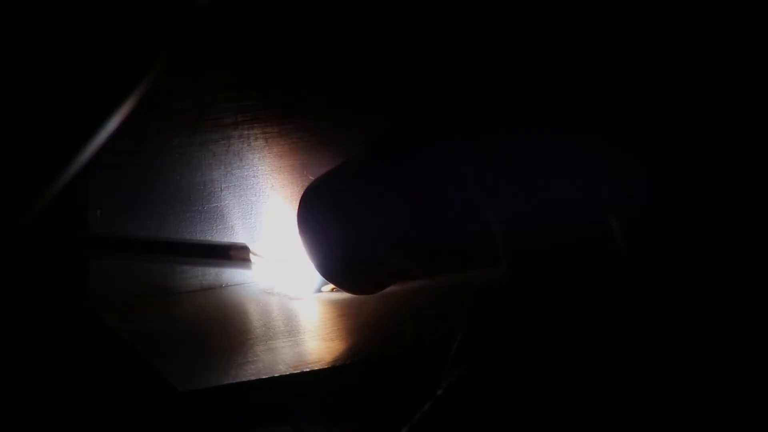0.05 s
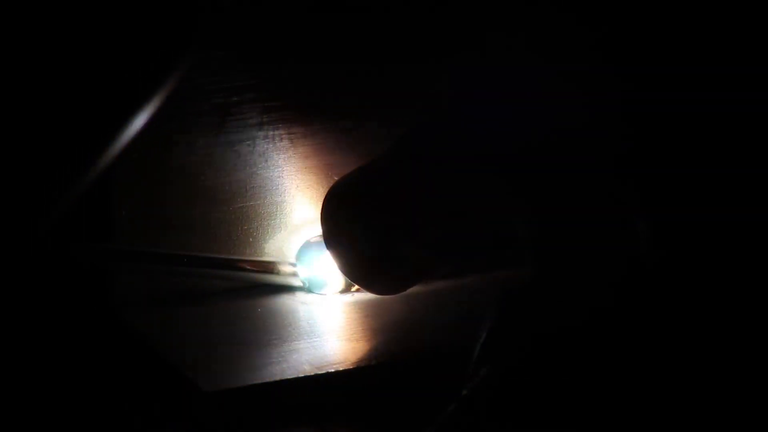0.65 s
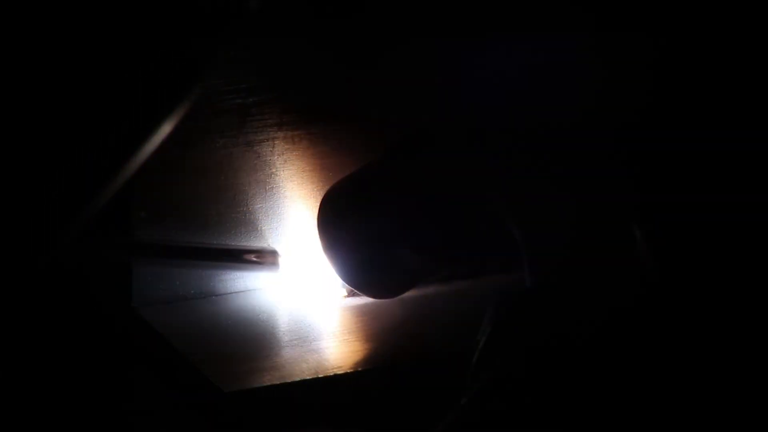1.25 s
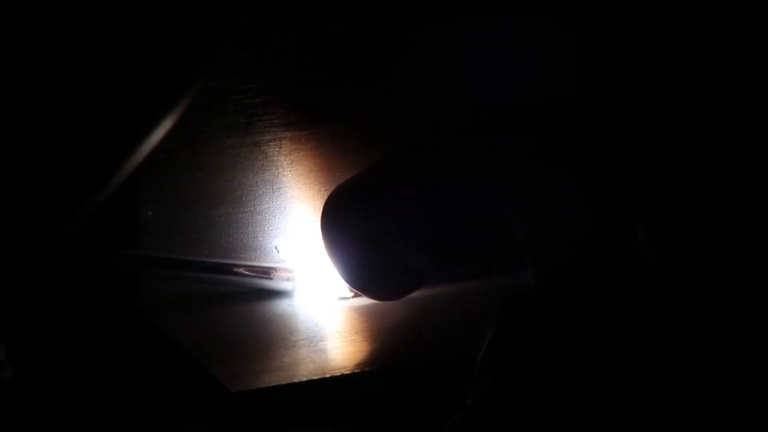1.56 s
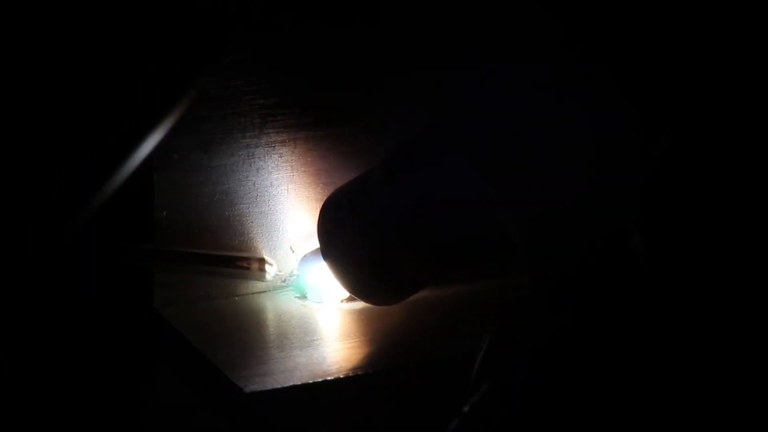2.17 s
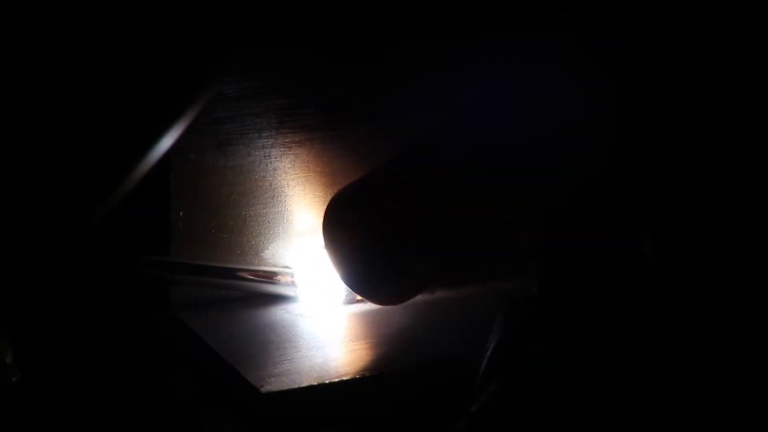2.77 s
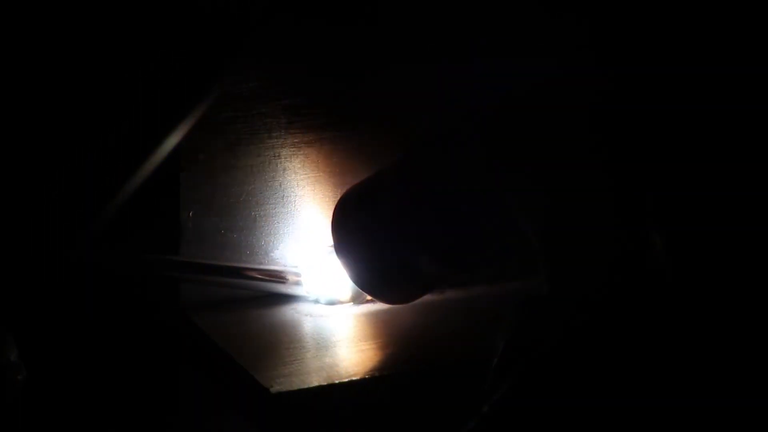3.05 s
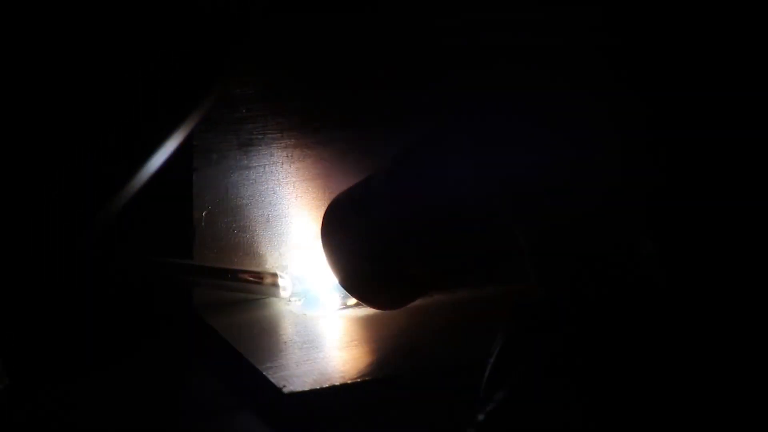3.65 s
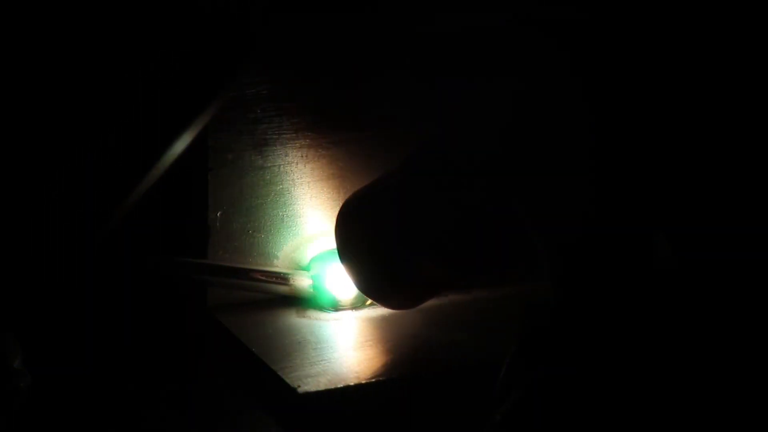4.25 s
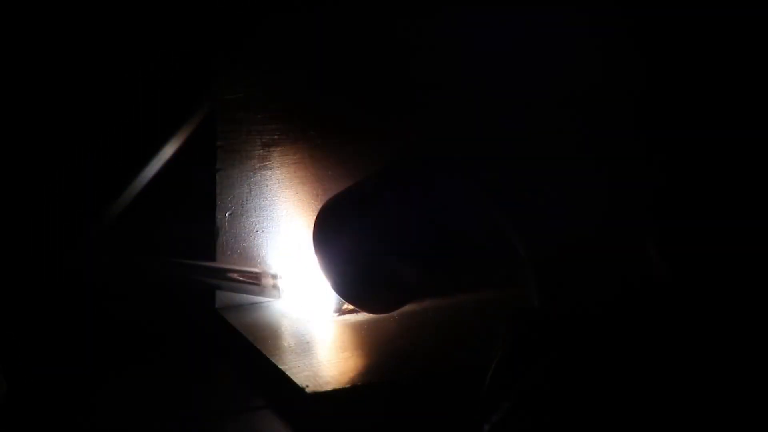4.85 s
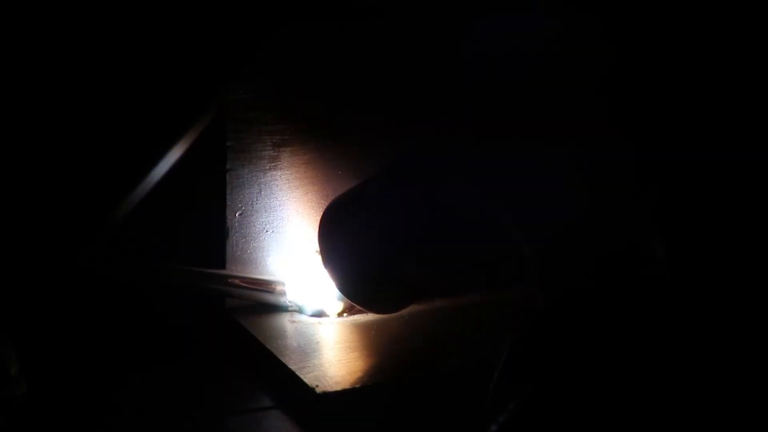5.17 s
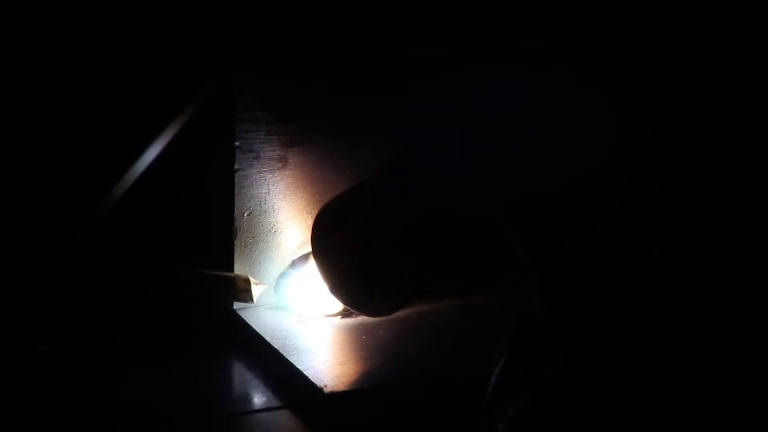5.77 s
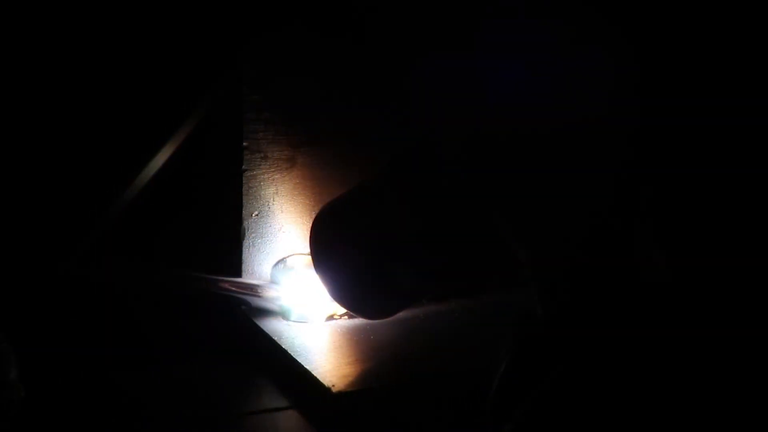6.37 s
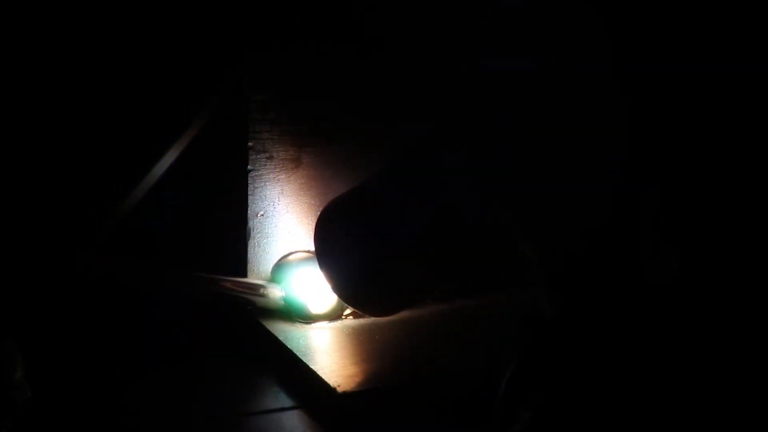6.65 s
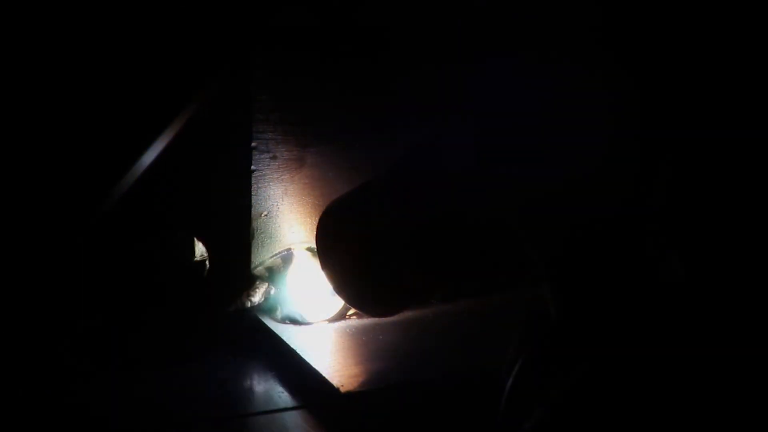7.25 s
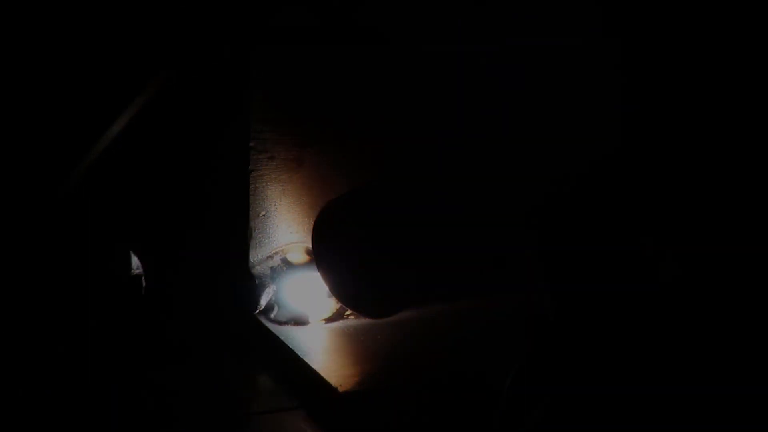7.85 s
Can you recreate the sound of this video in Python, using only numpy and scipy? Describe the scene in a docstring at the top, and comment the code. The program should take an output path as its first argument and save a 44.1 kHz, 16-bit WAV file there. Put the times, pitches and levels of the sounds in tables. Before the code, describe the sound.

A welding arc buzzes without a break as a torch runs along a seam between metal plates. The buzz is bright and raspy, with a thin high whine in it. About once a second it turns rough and crackly as the filler rod dips in, spitting twice around the middle, and it weakens at the end. Faint gas hiss and a fan lie behind. The arc is close and slightly to the right.

```python
"""A workshop, where an AC TIG arc runs along a seam between two steel plates.
Twice a cycle the current reverses: the arc re-ignites with a sharp snap, then a soft tick, and the
inverter whines round each reversal. Filler dipped in the pool makes the snaps fat and uneven and
sometimes spits; snaps and pops set the plates ringing. Behind the arc, shielding gas hisses, the
supply hums, the welder's fan runs and other machinery sings faintly."""
import sys
import numpy as np
from scipy import signal
from scipy.fft import rfft, irfft, next_fast_len
from scipy.io import wavfile
from scipy.ndimage import uniform_filter1d

SR = 44100
rng = np.random.default_rng(int(sys.argv[2]) if len(sys.argv) > 2 else 0)


def file_out(sig):
    """Save sig as 16-bit WAV at sys.argv[1]."""
    # one column per channel
    cols = np.atleast_2d(sig).T
    # limit, then scale
    lim = np.clip(cols, -1, 1)
    pcm = np.round(lim * 32767).astype(np.int16)
    wavfile.write(sys.argv[1], SR, pcm)


N = 348390
TIME = np.arange(N) / SR
AC_HZ, FIRST_SNAP_S, SOFT_DELAY_S = 118.929, .00785, .003165   # the soft reversal trails the snap
SIDES = np.array([[1], [-1]])   # adds on the left, subtracts on the right


def from_db(db):
    """Decibels to amplitude."""
    return 10 ** (np.asarray(db) / 20)


def unit_rms(x):
    """The signal scaled to rms 1."""
    return x / np.sqrt(np.mean(x ** 2) + 1e-20)


def at_times(rows, t):
    """Each column of an automation table, read at times t."""
    times, *columns = np.transpose(rows)
    return [np.interp(t, times, column) for column in columns]


def at_hz(curve, hz):
    """A curve read along a log-frequency axis."""
    corners_hz, values = np.transpose(curve)
    return np.interp(np.log(np.maximum(hz, 1)), np.log(corners_hz), values)


def drift(spread, step_s, start_s=0, end_s=TIME[-1] + 1):
    """A random curve that glides to a new value every step."""
    steps = np.arange(start_s, end_s, step_s)
    return np.interp(TIME, steps, rng.normal(0, spread, len(steps)))


def pan(left_over_right_db):
    """Left and right gains with the given level gap."""
    return from_db(SIDES * left_over_right_db / 2)


def resonance(x, hz, width_hz):
    """Two-pole band-pass with gain 1 at its peak."""
    r = np.exp(-np.pi * width_hz / SR)
    poles = [1, -2 * r * np.cos(2 * np.pi * hz / SR), r * r]
    return signal.lfilter(np.array([1, 0, -1]) * (1 - r * r) / 2, poles, x + 1e-18)


def noise(spectrum):
    """Noise of the given colour, rms 1."""
    size = next_fast_len(N)
    colour = from_db(at_hz(spectrum, np.arange(size // 2 + 1) * SR / size))
    return unit_rms(irfft(rfft(rng.standard_normal(size)) * colour, size)[:N])


def noise_band(hz, width_hz):
    """Noise ringing through one resonance, rms 1."""
    return unit_rms(resonance(rng.standard_normal(N), hz, width_hz))


# Colour of the fan's air rush: (frequency [Hz], level [dB])
RUSH_COLOUR = [(25, -25), (50, -7.5), (110, -13), (160, -6.5), (240, -4.5), (480, -2.5), (700, -3),
               (880, -5.5), (1150, -5), (1600, -7), (2400, -10.5), (3400, -20), (6000, -40)]
# Air resonances in the fan housing: (frequency [Hz], width [Hz], level [dB])
HOUSING_MODES = [(150.3, 8, -77.5), (169.8, 18.8, -75), (295, 14, -83), (384, 62, -77.5), (1160, 70, -77),
                 (1294, 25, -79.5)]
# Stereo image of the fan: (frequency [Hz], left-right likeness [0-1])
FAN_LIKENESS = [(30, 1), (150, 0.98), (300, 0.8), (550, 0.74), (1100, 0.23), (2500, 0.029)]
def fan(rush_db=-67.5):
    """Air rushes through a resonant housing: centred in the bass, diffuse above."""
    size = next_fast_len(N)
    spectra = []
    for _ in range(2):
        rush = from_db(rush_db) * noise(RUSH_COLOUR)
        housing = sum(from_db(db) * noise_band(hz, width) for hz, width, db in HOUSING_MODES)
        spectra.append(rfft(rush + housing, size))
    mid, side = spectra
    alike = np.clip(at_hz(FAN_LIKENESS, np.linspace(0, SR / 2, len(mid))), 0, 1)
    spread = np.sqrt((1 - alike) / (1 + alike))
    return irfft(mid + spread * side * SIDES, size)[:, :N]


# Partials of the fan's blade tone: (harmonic [x blade rate], level [dB])
BLADE_PARTIALS = [(1, -78.5), (2, -78.5), (3, -82.5)]
def blades(blade_hz=245.2, wander_rad=0.473):
    """The passing blades drone; the fan's speed wanders slightly."""
    phase = 2 * np.pi * blade_hz * TIME + drift(wander_rad, step_s=0.4064)
    return sum(np.sqrt(2) * from_db(db) * np.sin(order * phase) for order, db in BLADE_PARTIALS)


# Machines elsewhere in the shop: (frequency [Hz], level [dB])
MACHINE_TONES = [(402.6, -82.5), (805.2, -84), (1308, -83.5)]
def machinery(width_hz=2.2):
    """Other running machines lay faint, wavering tones into the bed."""
    return sum(from_db(db) * noise_band(hz, width_hz) for hz, db in MACHINE_TONES)


# Colour of the gas hiss: (frequency [Hz], level [dB])
GAS_COLOUR = [(1500, -10.5), (2600, -4), (3750, 2.5), (4500, -2), (5200, -4), (7200, 4), (10000, 2),
              (13000, 0), (16000, -9)]
def gas(level_db=-62.5, width=0.92):
    """Shielding gas leaves the cup in a wide, bright hiss."""
    return from_db(level_db) * (noise(GAS_COLOUR) + width * noise(GAS_COLOUR) * SIDES)


# Partials of the electrical hum: (harmonic [x AC rate], level [dB])
HUM_PARTIALS = [(2, -79.5), (3, -81.5), (4, -80), (7, -81), (8, -79.5), (10, -77.5), (11, -82), (12, -81),
                (13, -82), (15, -78), (16, -77.5), (17, -82), (19, -80), (20, -78)]
def hum(follow=0.65):
    """The arc and its supply hum, partly riding the whine's level; each side has its own phase."""
    partials = 0
    for order, level_db in HUM_PARTIALS:
        phase = 2 * np.pi * (order * AC_HZ * TIME + rng.random())
        lead = rng.uniform(-0.75, 1) * min(order / 10, 1)   # long waves arrive in step
        partials += np.sqrt(2) * from_db(level_db) * np.sin(phase + lead * SIDES)
    whine_db = whine_level(TIME)
    return partials * from_db(follow * (whine_db - np.median(whine_db)))


# The filler rod dips into the pool about once a second:
# (deepest time [s], half-length [s], depth [0-1], snap swell [dB], unrest [0-1])
ROD_DIPS = [(0.868, 0.2, 0.37, 1.5, 0.46), (2.065, 0.21, 0.55, 0.5, 1), (3.197, 0.19, 0.3, 2, 0.5),
            (4.295, 0.24, 0.54, 2, 0.8), (5.52, 0.124, 0.76, 2.5, 1), (6.698, 0.25, 0.36, 1.5, 0.9),
            (7.5, 0.35, 0.02, 0.5, 0.8)]
def dipping(t, lead_s=0.06, lag_s=0.17, sag_share=0.63):
    """Depth, swell in dB and unrest of the dips: snaps swell as the rod enters, sag as it leaves."""
    at, half_s, depth, swell_db, unrest = np.transpose(ROD_DIPS)
    bell, entering, leaving = [np.exp(-((t[:, None] - at - shift) / half_s) ** 2)
                               for shift in (0, -lead_s, lag_s)]
    return bell @ depth, (entering - sag_share * leaving) @ swell_db, bell @ unrest


# The arc between dips, as the torch travels along the seam:
# (time [s], snap level [dB], snap fatness [dB], whine level [dB])
SEAM_RIDE = [(0.0, -32.5, 6.5, -52), (0.4, -30, 4, -50), (1.6, -30, 2.5, -51), (2.7, -29.5, 1.5, -50.5),
             (3.7, -28.5, -2, -51), (5.0, -28.5, -2, -52), (6.1, -28.5, -2.5, -54), (7.25, -29.8, 0.8, -55),
             (7.9, -34, 2, -63)]
def whine_level(t, dip_db=-6):
    """The whine's fader in dB: it fades along the seam and ducks while the rod is in the pool."""
    _, _, whine_db = at_times(SEAM_RIDE, t)
    depth, _, _ = dipping(t)
    return whine_db + dip_db * depth


def whine(gain_db=12.3, harmonic=84, turn_s=0.00026, flutter_db=0.7, slip_rad=0.14):
    """The inverter's switching ripple swells as the current ramps down and up, and flips with it."""
    swell = 0
    for delay_s, fall_s, rise_s in (0, 0.0009, 0.00074), (SOFT_DELAY_S, 0.00054, 0.00108):
        cycles = (TIME - FIRST_SNAP_S - delay_s) * AC_HZ
        since_s = ((cycles + .5) % 1 - .5) / AC_HZ   # negative ahead of the reversal
        ramp_s = np.where(since_s < 0, fall_s, rise_s)
        swell += np.tanh(since_s / turn_s) * np.exp(-(since_s / ramp_s) ** 2)
    # no two cycles are quite alike in level or phase
    flutter, slip = [drift(spread, 1 / AC_HZ, FIRST_SNAP_S, TIME[-1])
                     for spread in (flutter_db, slip_rad)]
    ripple = np.cos(2 * np.pi * harmonic * AC_HZ * (TIME - FIRST_SNAP_S) + slip)
    return from_db(whine_level(TIME) + gain_db + flutter) * swell * ripple


# Where a fat click gains its bite: (frequency [Hz], boost [dB per dB of fatness])
FATNESS_EQ = [(1000, 0.38), (3000, 0.76), (7000, 1.068), (10000, 0.24), (12500, 0.043), (16000, 0.74)]
def clicks(times, level_db, spectrum, fat_db, size=256):
    """Pressure pulses with a hard attack, each with its own level and fatness."""
    hz = np.arange(size // 2 + 1) * SR / size
    colour = unit_rms(from_db(at_hz(spectrum, hz)))
    gains = colour * from_db(level_db[:, None] + fat_db[:, None] * at_hz(FATNESS_EQ, hz))
    # minimum phase packs the energy at the front of each pulse
    cepstrum = irfft(np.log(gains))[:, :size // 2]
    cepstrum[:, 0] /= 2
    start, fraction = np.divmod(times * SR, 1)
    delay_phase = 2 * np.pi * hz / SR * fraction[:, None]
    pulses = irfft(np.exp(rfft(2 * cepstrum, size) - 1j * delay_phase))
    samples = start[:, None].astype(int) + np.arange(size)
    return np.bincount(samples.ravel(), pulses.ravel(), N)[:N]


# Colour of the soft tick: (frequency [Hz], level [dB])
TICK_COLOUR = [(300, -28), (1200, -25), (2300, -11.5), (3600, 7), (5100, 2.5), (6500, 11), (8500, 12),
               (11000, 5), (13000, -11), (16000, -7)]
def soft_ticks(gain_db=14.0, scatter_db=0.16, lead_s=.0001):
    """The reversal back to the hot electrode takes little voltage and only ticks."""
    times = np.arange(FIRST_SNAP_S + SOFT_DELAY_S - lead_s - 1 / AC_HZ, N / SR, 1 / AC_HZ)
    force_db = rng.normal(0, scatter_db, len(times))
    return -clicks(times, whine_level(times) + gain_db + force_db, TICK_COLOUR, force_db / 2)


# Colour of the snap: (frequency [Hz], level [dB])
SNAP_COLOUR = [(300, -29.5), (1200, -22.5), (2300, -20), (3300, -9.5), (4350, -12.6), (5200, -17),
               (6100, -12), (7100, -7.5), (8300, -2), (9800, -0.6), (11300, -1.5), (13000, -7),
               (14500, -15), (16000, -14.5)]
# The hand-held torch bobs, and the snaps grow harder and softer: (time [s], level [dB])
TORCH_SWAY = [(0, -1.1), (0.42, -0.6), (0.58, -1), (0.8, 0.2), (1.0, 1.2), (1.12, 0.1), (1.5, 0),
              (1.72, -1.5), (1.97, 0.6), (2.3, -2), (2.55, 0), (2.92, -1.6), (3.06, -1.4), (3.14, 1.2),
              (3.3, -1.6), (3.78, 0.2), (4.08, -0.5), (4.3, 0.7), (4.8, -1.1), (5.05, -0.5), (5.3, 0),
              (5.45, -1), (6.1, 0), (6.35, -1.2), (7.4, 0.2)]
# The arc falters into weak snaps: (centre time [s], length [s], level against the usual snap [dB])
ARC_FALTERS = [(.832, .008, -7), (.937, .017, -4.5), (.966, .008, -5), (1.1, .034, -1.5), (1.87, .017, -5),
               (1.933, .008, -5.5), (2.001, .008, -7), (2.198, .017, -4), (3.081, .017, -3),
               (3.228, .034, -3), (4.141, .034, -2), (4.284, .017, -7), (4.338, .008, -9),
               (4.452, .017, -2), (4.477, .017, -1), (4.511, .017, -1), (5.52, .017, -7), (5.587, .017, -7),
               (5.612, .017, -5), (6.516, .008, -3), (6.566, .008, -5), (6.592, .008, -4.5),
               (6.65, .008, -10), (6.676, .008, -3), (7.21, .017, -5.5), (7.642, .025, -4)]
# Accents from hard re-ignitions: (time [s], level against the usual snap [dB])
HARD_SNAPS = [(.823, 2), (.840, 2), (.849, 2), (.874, 3), (.908, 2.5), (.916, 1), (.958, 0.5), (.975, 2),
              (1.79, 4), (2.017, 2.3), (2.043, 5), (2.059, 2.6), (2.16, 2), (2.211, 2.5), (3.253, 3),
              (3.279, 2), (3.363, 2.5), (3.371, 4), (4.212, 2.3), (4.271, 2.5), (4.296, 4), (4.305, 4),
              (4.321, 2.5), (4.38, 0), (4.414, 2), (4.431, 4.5), (4.439, 2), (4.464, 4.5), (4.498, 4),
              (4.532, 4), (4.557, 5), (4.574, 4), (4.582, 4.5), (4.607, 5), (4.658, 3), (4.666, 4),
              (5.507, 2.5), (5.532, 1.5), (5.549, 1.7), (5.574, 1.7), (5.599, 2.7), (5.633, 3.2),
              (5.734, 3), (5.860, 2.5), (6.550, 5), (6.626, 0), (6.768, 2), (6.970, 2.8), (6.978, 3),
              (7.222, 3.8), (7.29, 4), (7.365, 3), (7.441, 2.3), (7.617, 4.3)]
def snaps(gain_db=0.5, scatter_db=0.72, unrest_db=2.5, wander_db=0.7, ceiling_db=2.5,
          dip_fat_db=2, fat_per_db=0.5, fat_scatter_db=0.5, jitter_s=1.5e-6):
    """The arc re-ignites once a cycle, unevenly during dips; the harder the snap, the fatter."""
    times = np.arange(FIRST_SNAP_S, N / SR, 1 / AC_HZ)
    snap_db, fat_db, _ = at_times(SEAM_RIDE, times)
    depth, swell_db, unrest = dipping(times)
    scatter, fat_scatter, jitter, wander = rng.standard_normal((len(times), 4)).T
    force_db = (scatter_db + unrest_db * unrest) * scatter
    force_db += wander_db * unit_rms(uniform_filter1d(wander, size=9))
    # the ignition voltage has a limit
    force_db = np.minimum(force_db, ceiling_db * np.tanh(force_db / ceiling_db))
    for at, length_s, falter_db in ARC_FALTERS:
        force_db[np.abs(times - at) < length_s / 2] = falter_db
    for at, accent_db in HARD_SNAPS:
        force_db[np.abs(times - at).argmin()] = accent_db
    force_db += at_times(TORCH_SWAY, times)[0]
    fat_db += dip_fat_db * depth + fat_per_db * force_db + fat_scatter_db * fat_scatter
    level_db = snap_db + gain_db + swell_db + force_db
    return clicks(times + jitter_s * jitter, level_db, SNAP_COLOUR, fat_db)


# EQ ride on the snaps' top treble: (time [s], gain [dB])
SHEEN_RIDE = [(0.4, -1), (3.7, -.5), (6.1, 1.5), (7.3, 2), (7.9, 2)]
def sheen(ignitions, hz=12000, width_hz=2200):
    """The top of the snaps brightens as the torch travels along the seam."""
    boost = from_db(at_times(SHEEN_RIDE, TIME)[0]) - 1
    return ignitions + boost * resonance(ignitions, hz, width_hz)


# Ringing modes of the steel plates: (frequency [Hz], width [Hz], gain [dB])
PLATE_MODES = [(3092, 50, -5), (3449, 50, -1), (3806, 35, 8), (4180, 60, 2), (6400, 150, -3),
               (7017, 60, -1.6), (9520, 250, -7)]
def plates(blows, wander_db=0.6):
    """Snaps and pops ring the plates; each mode is struck harder or softer as the arc moves about."""
    return sum(from_db(db + drift(wander_db, step_s=0.324)) * resonance(blows, hz, width)
               for hz, width, db in PLATE_MODES)


# Colour of a pop: (frequency [Hz], level [dB])
POP_COLOUR = [(150, -34), (500, -16), (1200, -12.5), (1750, -14.5), (2070, -4.5), (2650, -12), (3000, -4),
              (3550, -2), (4400, -5), (4850, -14), (6300, -8), (7500, 0), (10000, -1), (12000, 0),
              (16000, -20)]
# Bursts of sizzle from the pool: (start [s], length [s], rate [pops/s], level [dB])
SIZZLE_BURSTS = [(0.82, .16, 90, -45), (1.988, 0.087, 70, -45), (4.303, 0.098, 420, -33.5),
                 (4.331, 0.045, 1000, -34), (4.405, 0.052, 340, -43), (5.535, .09, 90, -45)]
# Lone pops off the pool: (time [s], level [dB])
SINGLE_POPS = [(4.4002, -35), (5.5441, -33), (5.5616, -34), (5.5779, -29), (5.5947, -36)]
def spits(scatter_db=3.2, earliest_s=0.000493, latest_s=.0046, fat_scatter_db=2.5):
    """Oxide pops off the pool, each pop its own colour; sizzle comes as the arc cleans after a snap."""
    times, levels = np.transpose(SINGLE_POPS)
    for start, length, per_s, level_db in SIZZLE_BURSTS:
        count = max(int(per_s * length), 1)
        cycle = np.round((np.linspace(start, start + length, count) - FIRST_SNAP_S) * AC_HZ)
        after_snap_s = rng.uniform(earliest_s, latest_s, count)
        times = np.append(times, FIRST_SNAP_S + cycle / AC_HZ + after_snap_s)
        levels = np.append(levels, level_db + rng.normal(0, scatter_db, count))
    return clicks(times, levels, POP_COLOUR, rng.normal(0, fat_scatter_db, len(times)))


# Early reflections off near surfaces: (delay [s], left gain [x], right gain [x])
REFLECTIONS = [(.000159, 0.042, 0.095), (.000181, 0.00061, -0.33), (.000431, 0.12, -0.068),
               (.000635, -.13, 0.076), (.001746, -0.18, 0.095), (.005646, .1, -0.024),
               (.006553, -0.09, -0.102), (.007574, -0.2, -0.028)]
def workshop(x, tail_db=-8.5, t60_s=0.25, dull_hz=7000):
    """Near surfaces throw the sound back, and the room adds a short, duller, diffuse tail."""
    near = sum(np.pad(x, (round(delay * SR), 0))[:N] * np.array([[left], [right]])
               for delay, left, right in REFLECTIONS)
    t = np.arange(SR // 2) / SR
    lowpass = signal.butter(1, dull_hz, fs=SR, output="sos")
    tail = signal.sosfilt(lowpass, rng.standard_normal((2, len(t))))
    tail = unit_rms(tail * from_db(-60 * t / t60_s)) / np.sqrt(len(t))
    return near + from_db(tail_db) * signal.fftconvolve(x[None], tail, axes=1)[:, :N]


# Fader for gas, fan and machinery, easing off as the arc dies down: (time [s], level [dB])
BED_RIDE = [(0, -2), (0.7, 0), (7.3, 0), (7.55, -1), (7.9, -3)]
def scene(hollow_depth=0.47):
    """The mix: arc, gas and hum sit to the right, with the fan all round."""
    blows = sheen(snaps()) + spits()
    arc = blows + plates(blows) + soft_ticks() + whine()
    arc -= hollow_depth * resonance(arc, hz=9930, width_hz=250)   # a notch hollows out the whine
    bed_gain = from_db(at_times(BED_RIDE, TIME)[0])
    torch = arc + workshop(arc) + bed_gain * gas()
    return torch * pan(-4.5) + hum() * pan(-7.0) + bed_gain * (fan() + blades() + machinery())


def record(dry, cutoff_hz=15900):
    """A steep, linear-phase high cut trims the very top and keeps the snaps crisp."""
    lowpass = signal.firwin(401, cutoff_hz, fs=SR, window="blackman")
    return signal.fftconvolve(dry, lowpass[None], "same", axes=1)


dry = scene()
out = record(dry)
file_out(out)
```